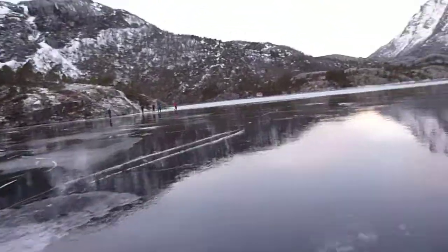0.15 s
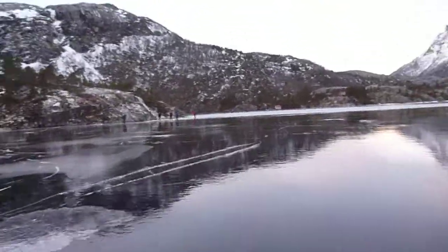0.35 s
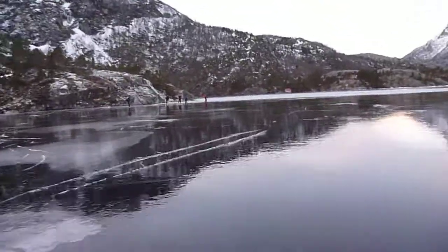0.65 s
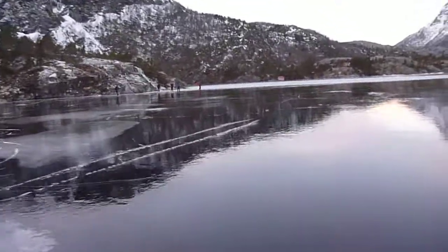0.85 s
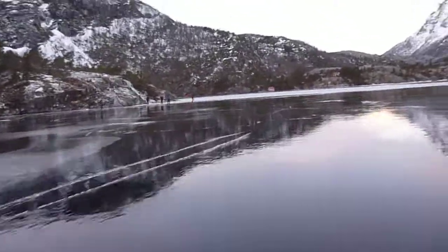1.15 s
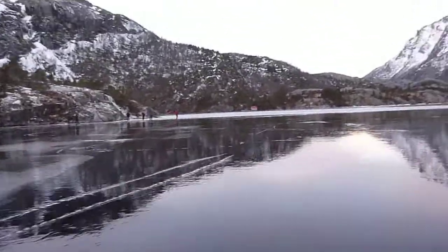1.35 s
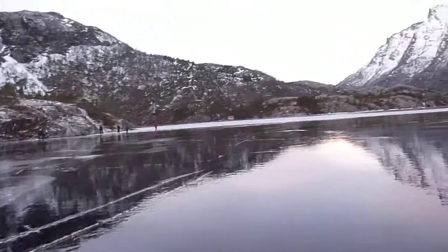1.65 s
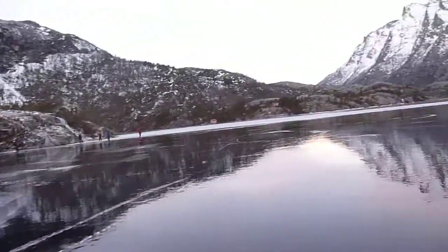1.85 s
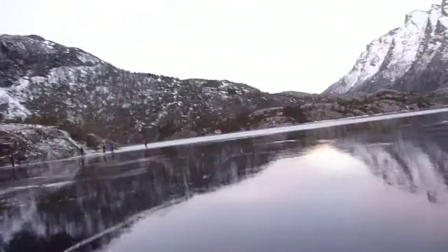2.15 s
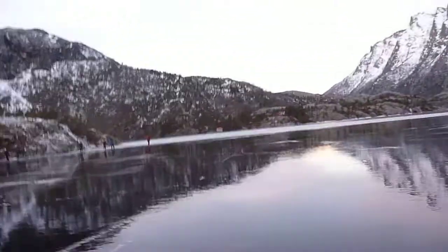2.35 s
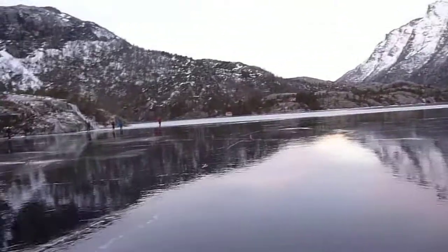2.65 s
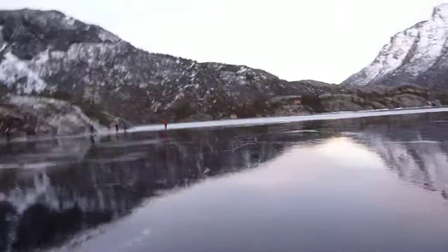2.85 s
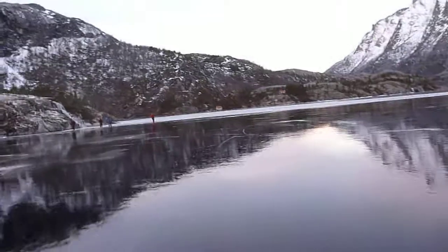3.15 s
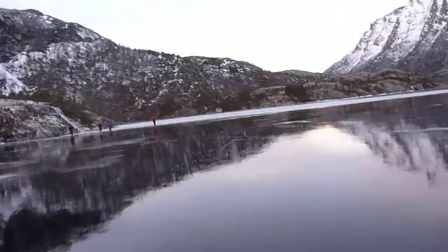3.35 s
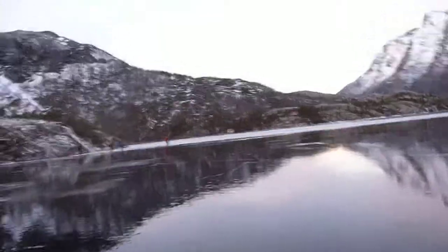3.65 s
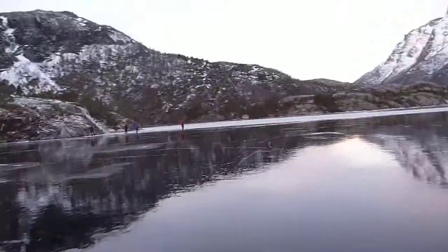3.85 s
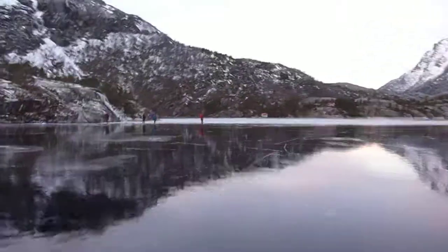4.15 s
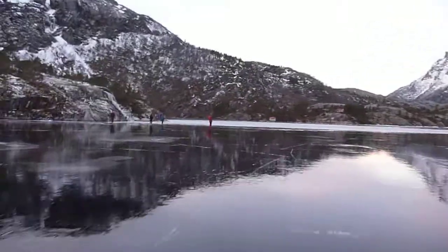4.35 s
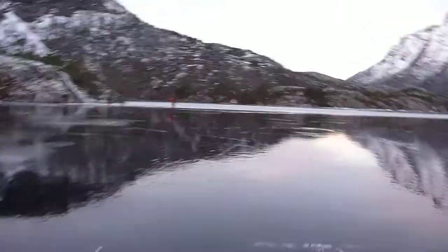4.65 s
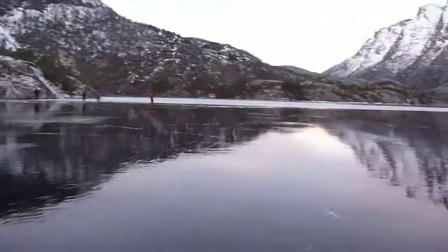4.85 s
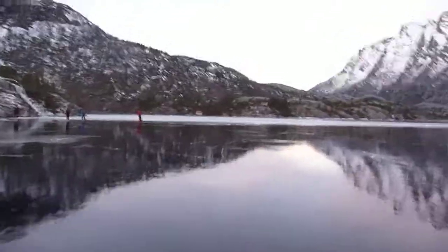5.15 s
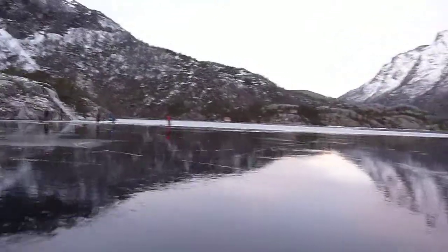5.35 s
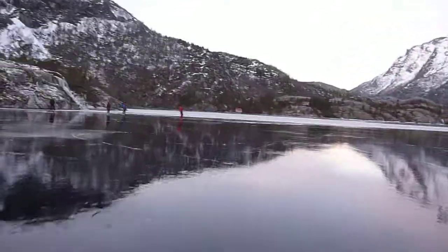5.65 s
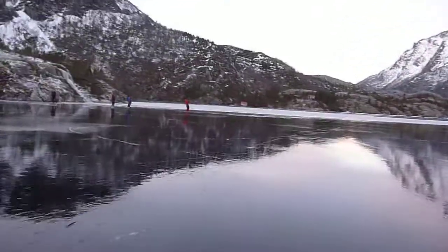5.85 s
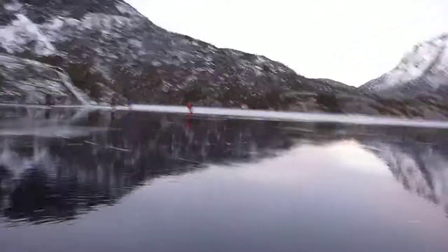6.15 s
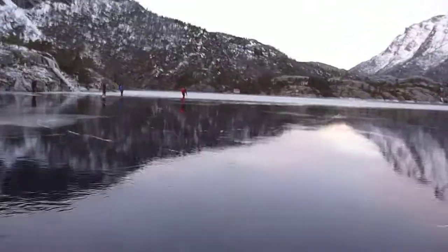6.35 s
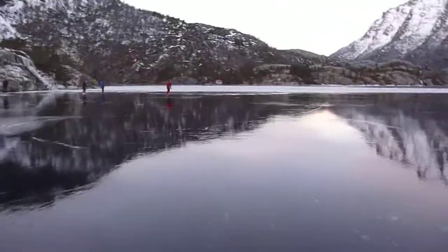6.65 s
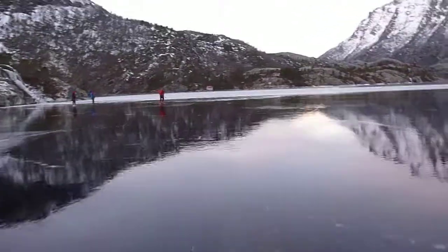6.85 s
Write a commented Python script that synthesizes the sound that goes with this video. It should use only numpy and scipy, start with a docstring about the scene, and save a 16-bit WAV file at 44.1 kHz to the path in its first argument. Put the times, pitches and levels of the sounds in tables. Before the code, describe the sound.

A skater crosses clear lake ice. Blades hiss and grind unevenly, swelling at short pushes, while sharp brittle cracks and clicks come thickest in the first second and a half. Another cluster of cracks hits past the middle, then they thin out. Faint low chirps fall and settle in the ice sheet. Open air, no echo, close thin microphone with muted deep lows and dull top.

```python
"""A skater glides over clear lake ice, heard dry in the open over a faint low rumble of moving air.
From the start the blades hiss and grind, louder at each push: patchy noise and chips drive resonances.
The ice soon cracks under the load: jolts and brief tearing ring it for milliseconds. Dragging steel sings
in narrow drifting noise bands. Throughout, the sheet gives falling chirps, some strong, some faint:
sine sweeps that settle near 310 Hz."""
import sys
import numpy as np
from scipy import signal
from scipy.fft import rfft, irfft, next_fast_len
from scipy.io import wavfile
from scipy.ndimage import uniform_filter1d, map_coordinates

SR = 44100
rng = np.random.default_rng(int(sys.argv[2]) if len(sys.argv) > 2 else 0)


def unload_wav(signal):
    """Save mono or channel-first audio to the path in sys.argv[1] as 16-bit WAV at rate SR, clipped to [-1, 1]."""
    wavfile.write(
        sys.argv[1],
        SR,
        np.round(np.clip(np.atleast_2d(signal).T, -1, 1) * 32767).astype(np.int16),
    )


N = 309341

# gliding blades: start_s, level_db, brightness_db, fizz_over_level_db
BLADES = [(0.0, -39, 0.5, -5.5), (0.45, -43.5, -0.5, -32), (0.64, -47.5, 5, -4.5), (1.13, -34.5, -2, -11),
          (1.29, -49.5, -1, -4), (1.6, -46, -0.5, -6.5), (1.63, -39, 0, -15), (1.79, -40, 2.5, -11),
          (1.89, -36, -1, -23), (2.26, -47.5, 0.5, -3.5), (2.52, -45.5, 1, -23), (2.71, -43, 2, -9),
          (2.87, -39.5, 7, 5), (3.05, -45.5, -1, -4.5), (3.18, -44, -0.5, -9), (3.49, -37.5, 0.5, -18),
          (4.02, -47.5, 0, -7), (4.07, -39.5, -0.5, -1), (4.2, -35, 2.5, -3), (4.38, -38, 2, -16.5),
          (4.45, -35.5, -5.5, -9), (4.5, -38.5, 5.5, -4), (4.71, -42.5, -1.5, -3.5), (4.9, -43, 2, -8),
          (5.21, -39, 0, -26), (5.56, -40, 3.5, -13.5), (5.99, -38, 2.5, -17), (6.032, -41, -0.5, -15),
          (6.05, -35.5, -1.5, -15.5), (6.21, -44, 3, 2), (6.4, -44, -1.5, -27.5), (6.68, -37, 1, -22),
          (6.93, -38, -2, -22.5), (7.01, -43.5, 5.5, -16)]
# click resonance of the ice: centre_hz, width_hz, level_db
CLICK = [(2080, 2820, 0.011)]


def amp(db):
    """dB to gain."""
    return 10 ** (np.asarray(db) / 20)


def unit(x):
    """Scaled to rms 1."""
    return x / np.sqrt(np.mean(x ** 2) + 1e-20)


def wobble(knots_per_s):
    """Smooth random curve: a spline through random knots."""
    knots = rng.standard_normal(int(N * knots_per_s / SR) + 4)
    return map_coordinates(knots, [np.arange(N) * knots_per_s / SR])


def filtered(x, response):
    """x times a complex response of frequency, along the last axis."""
    size = next_fast_len(x.shape[-1] + 2048)
    spectrum = rfft(x, size) * response(np.fft.rfftfreq(size, 1 / SR))
    return irfft(spectrum, size)[..., :x.shape[-1]]


def ringing(modes):
    """Causal response of a few resonances, added with alternating sign."""
    return lambda f: sum((-1) ** k * amp(db) * 1j * f * width / (hz * hz - f * f + 1j * f * width)
                         for k, (hz, width, db) in enumerate(modes))


def placed(start_s, rows):
    """Short sounds summed at their start times."""
    at = np.round(np.asarray(start_s) * SR).astype(int)[:, None] + np.arange(rows.shape[1])
    return np.bincount(at.ravel(), rows.ravel(), N + rows.shape[1])[:N]


def air():
    """Moving air: faint noise, mostly below 35 Hz."""
    return amp(-61.0) * unit(filtered(rng.standard_normal(N), lambda f: 1 / (1 + (f / 35) ** 2)))


def patchy(depth_db):
    """Noise whose strength drifts in patches of time and frequency."""
    spectrum = signal.stft(rng.standard_normal(N), nperseg=256)[2]
    field = uniform_filter1d(rng.standard_normal(spectrum.shape), size=3, axis=0)
    field = uniform_filter1d(field, size=14, axis=1)
    return unit(signal.istft(spectrum * amp(depth_db * unit(field)), nperseg=256)[1][:N])


def chips(per_second, spread_db, t60_s):
    """Ice chips breaking off at random: tiny noise bursts, a few much larger than the rest."""
    count = int(per_second * N / SR)
    t = np.arange(SR // 50) / SR
    size = amp(spread_db * np.minimum(rng.exponential(size=(count, 1)), 3))
    start_s = rng.uniform(0, N / SR, count)
    bursts = size * amp(-60 * t / t60_s) * rng.standard_normal((count, len(t)))
    return unit(placed(start_s, bursts))


def blades():
    """Steel edges shave the ice: patchy noise and chips drive its resonances, harder as an edge digs in."""
    # the edge digs in hard, and the short row at 3.602 s is a brief crackling burst: peak_s, rise_s, fall_s,
    # level_db, brightness_db, fizz_db
    push_table = [(.335, 0.026, 0.02, -33, -1, -41.5), (.76, 0.0049, 0.0059, -42, 4, -35),
                  (1.14, 0.011, 0.012, -33, 1.5, -41.5), (1.842, 0.032, 0.058, -41.5, 1, -55),
                  (2.579, 0.0036, .012, -40, 6.5, -39), (2.609, 0.0057, 0.013, -42.5, 6.5, -37),
                  (2.645, .012, 0.011, -40, 2.5, -42.5), (2.681, 0.0071, 0.0056, -37, 2.5, -48.5),
                  (2.723, 0.0028, 0.0065, -43, -2, -44.5), (2.866, 0.052, 0.024, -33.5, -2.5, -46.5),
                  (3.602, 0.0022, .005, -26.5, -2.5, -47), (3.618, 0.06, 0.021, -39.5, -7, -56),
                  (3.665, 0.018, 0.016, -30.5, -1.5, -42.5), (4.523, 0.0018, 0.0035, -38, 4.5, -42),
                  (4.549, 0.014, 0.025, -31, -1.5, -42), (5.057, 0.021, 0.014, -37.5, 0, -54),
                  (5.302, 0.039, 0.022, -34.5, -6, -44), (5.867, 0.042, 0.036, -42, 10, -58.5),
                  (6.084, 0.017, 0.033, -32.5, -4, -42), (6.133, 0.017, 0.032, -39.5, 6.5, -39),
                  (6.466, 0.0057, 0.062, -34, 3, -56), (6.55, 0.0024, 0.021, -38.5, -4.5, -47.5),
                  (6.918, 0.035, 0.026, -32.5, -3, -53)]
    # rows thud, knock, click, snap: glide_over_level_db, push_over_level_db, brightness_share
    edge_mix = [(-8, -13, -0.45), (-8, -5.5, -0.86), (-5, 1.5, 0.7), (-3.5, -7, 1)]
    # fine ice dust thrown up by the edges: time_s, level_db
    dust_table = [(0.0, -55.5), (0.54, -51.5), (1.09, -64), (1.29, -66), (1.56, -77), (1.87, -67),
                  (2.26, -73), (2.56, -46.5), (2.75, -75), (3.05, -62), (4.22, -57.5), (4.88, -51.5),
                  (5.7, -42), (6.37, -72), (6.68, -48), (7.01, -51)]
    # resonances of ice, sheet, fizz and spray: centre_hz, width_hz, level_db
    thud_modes = [(510, 313, 4)]
    sheet_modes = [(313.6, 19.5, 0.011)]
    knock_modes = [(730, 510, -3), (1348, 740, 3)]
    snap_modes = [(3660, 1970, 0.011)]
    fizz_modes = [(5450, 1000, -1)]
    spray_modes = [(7200, 2000, 0.011)]
    rumble_db, rumble_follows = -51.5, 0.5  # the glide's thud only half follows the level
    push_square = 1.5  # 2 a soft swell, more a flat top

    t = np.arange(N) / SR
    s, *columns = np.transpose(BLADES)
    level_db, bright_db, fizz_db = [np.interp(t, s, c) for c in columns]
    glide_db, push_db, share = np.transpose(edge_mix)[:, :, None]
    # rows: rumble, knock, click, snap, fizz
    parts_db = np.vstack([glide_db + share * bright_db, fizz_db]) + level_db
    parts_db = parts_db + [1.4 * wobble(7) for _ in range(5)]
    parts_db[0] = rumble_db + rumble_follows * (parts_db[0] - parts_db[0].mean())

    push = 0
    for peak, rise, fall, db, bright, fizz in push_table:
        swell = np.exp(-np.maximum((peak - t) / rise, (t - peak) / fall) ** push_square)
        push = push + amp(np.vstack([db + push_db + share * bright, [fizz]])) ** 2 * swell
    power = amp(parts_db) ** 2 + push
    # dust rises with snap and fizz
    dust = amp(np.interp(t, *np.transpose(dust_table))) ** 2 + 0.0027 * (power[3] + power[4])
    digging = push.sum(0) / power.sum(0)

    # the edge bites unevenly
    chatter_db = 0.9 * wobble(35) + 1.6 * wobble(90) + (1 + digging) * wobble(220)
    broken = chips(per_second=500, spread_db=4, t60_s=0.006)
    grit = 0.4 + 0.18 * digging  # chips over noise
    rumble = filtered(patchy(depth_db=2.5) + 0.58 * broken,
                      lambda f: ringing(thud_modes)(f) + 1.7 * ringing(sheet_modes)(f))
    scrapes = []
    for modes in (knock_modes, CLICK, snap_modes, fizz_modes, spray_modes):
        drive = (patchy(depth_db=3.0) + grit * broken) / np.hypot(1, grit)
        scrapes.append(filtered(drive, lambda f: ringing(modes)(f) ** 1.44))  # steeper skirts
    scraping = sum(np.sqrt(p) * unit(part) for p, part in zip([*power[1:], dust], scrapes))
    return np.sqrt(power[0]) * amp(0.49 * chatter_db) * unit(rumble) + amp(chatter_db) * scraping


def cracks():
    """A jolt and brief tearing ring the ice at each crack's own pitches; the thud answers mostly to the jolt.

    A bright crack loses its knock, a dull one its snap, a long one its jolt; small ones crackle around them.
    """
    # large cracks: start_s, peak_db, brightness_db, thud_peak_db, tearing_t60_s, thud_hz, knock_hz, snap_hz
    large = [(0.1803, -23.5, -16, -31.5, 0.028, 436, 1200, 4270),
             (0.2193, -23.5, 1.5, -34, 0.036, 342, 1530, 3040),
             (0.2754, -10.5, -9, -45, 0.0099, 590, 1160, 3940),
             (0.373, -17, 6, -54, 0.0073, 470, 1740, 5170), (0.397, -26, 16, -54, 0.01, 474, 1630, 3490),
             (0.406, -17, 2.5, -32.5, 0.0033, 460, 1310, 3340), (0.41, -18, 3, -36, 0.01, 470, 1350, 4440),
             (0.4352, -23, 2.5, -26, 0.015, 450, 1330, 3470), (0.452, -29, 11, -51, .008, 450, 1500, 5200),
             (0.468, -7.5, -5.5, -42.5, 0.0085, 482, 1360, 4400),
             (0.4717, -17, 29, -14, 0.013, 510, 790, 4300), (0.523, -21, 17, -35.5, 0.007, 443, 2450, 3500),
             (0.5441, -18.5, 8, -42.0, 0.0065, 580, 1250, 5400),
             (0.5497, -13, -3.5, -28.5, 0.0073, 415, 1500, 3130),
             (0.561, -20, 12, -41, 0.0078, 460, 1930, 3730), (0.5798, -19, 17, -39, 0.007, 450, 1430, 5050),
             (0.5921, -21, 7, -31, 0.011, 586, 1120, 4500), (0.6234, -19, 11, -42, 0.0029, 320, 1670, 4290),
             (0.634, -29.5, 5, -32.5, 0.0088, 550, 900, 3500), (0.666, -27, 12, -50, .015, 450, 1500, 3900),
             (0.6727, -22, 5, -23, 0.016, 556, 1800, 3450), (0.696, -23.5, 1, -34, 0.0039, 320, 2200, 5670),
             (0.7142, -21.5, 7, -35, 0.012, 417, 1660, 3930),
             (0.8, -4.5, 11.5, -31.5, 0.0056, 616, 1720, 4320),
             (0.872, -21, 6.5, -49, 0.006, 680, 1700, 3760), (0.967, -21, 18, -50, 0.024, 460, 1530, 3760),
             (1.0151, -18.5, 5.5, -38, 0.013, 330, 1420, 4000),
             (1.0735, -21.5, -2, -29.5, 0.0087, 710, 830, 3510),
             (1.085, -13.5, -5, -26, 0.012, 454, 1230, 3170),
             (1.101, -20, 1.5, -24.5, 0.021, 460, 820, 5470),
             (1.1562, -17, 0.5, -19.5, 0.01, 530, 763, 3230),
             (1.203, -20.5, 11, -38.5, 0.0063, 300, 1480, 6240),
             (1.222, -17, 4.5, -27, 0.012, 630, 1540, 4300),
             (1.254, -17.5, 27, -38, 0.027, 292, 1250, 4660), (1.273, -14, -2, -23, 0.007, 666, 1130, 4500),
             (1.3135, -20, 4.5, -30.5, 0.0085, 423, 1300, 4460),
             (1.317, -18.5, 4.5, -25.5, 0.012, 620, 1240, 4800),
             (1.4303, -23.5, 10, -58, 0.0049, 290, 1520, 4970),
             (1.46, -24.5, 6.5, -38, 0.013, 530, 2500, 4470),
             (1.539, -30.5, 3, -37.5, 0.021, 635, 2020, 4130),
             (1.597, -16.5, -3.5, -32.5, 0.003, 328, 1000, 3350),
             (1.9624, -18, -2.5, -29, 0.024, 346, 980, 3500),
             (2.007, -17, -18, -29.5, 0.021, 550, 1170, 3500),
             (2.136, -20, -2, -30.5, 0.011, 370, 1610, 3430),
             (2.15, -31.5, 3.5, -34.5, .02, 400, 1300, 5500),
             (2.207, -22.5, 12, -43, 0.0067, 288, 1550, 4950),
             (2.2753, -31, 2.5, -36, 0.024, 534, 2120, 3230),
             (2.453, -31, -4, -32.5, 0.0081, 453, 1250, 3690),
             (2.493, -29, -3, -41, 0.0044, 450, 1200, 3700), (2.519, -23, 8, -48, .004, 400, 2400, 5030),
             (2.5245, -19, 2.5, -36, 0.0072, 305, 1710, 3530),
             (2.5512, -27, 0, -38, 0.0085, 450, 1180, 5780), (2.7227, -24, 4, -45, 0.012, 543, 1190, 3470),
             (2.786, -23, -13, -34.5, 0.028, 395, 1300, 4040),
             (2.8041, -18, -5, -24, 0.0077, 490, 1160, 5700),
             (2.8159, -23, -4, -23, 0.0078, 533, 1330, 3260),
             (2.8836, -27, 3.5, -46, 0.0059, 400, 885, 5610),
             (3.0001, -28, -11, -31, 0.024, 555, 960, 4320),
             (3.022, -24, -2, -29.5, 0.011, 720, 1500, 2880),
             (3.0697, -21.5, 10, -61, 0.019, 480, 1550, 5100),
             (3.1958, -27.5, 1.5, -32.5, 0.0044, 467, 1530, 5530),
             (3.239, -23, 20, -40, 0.0085, 480, 930, 5300), (3.2815, -29.5, 1, -49, 0.005, 310, 1730, 3220),
             (3.351, -20.5, 15, -66, 0.0074, 590, 1500, 4970),
             (3.562, -16, -5.5, -24, 0.015, 464, 1550, 3130), (3.581, -28, -7, -28, 0.008, 480, 1030, 4380),
             (3.5989, -23, -5.5, -36, .012, 600, 1300, 4000),
             (3.613, -15.5, -4.5, -30, 0.0084, 635, 1040, 4070),
             (3.647, -18.5, -4, -23, 0.0067, 600, 1280, 3130),
             (3.6503, -13.5, -3, -27, 0.0076, 600, 1400, 3400),
             (3.6594, -18, -3, -28, 0.014, 650, 1200, 3400), (3.711, -26, 5, -35, 0.0049, 360, 1860, 4640),
             (3.7535, -40, 6, -31.5, 0.012, 330, 790, 3310),
             (3.7758, -16, -1.5, -20, 0.013, 566, 1310, 3730),
             (3.8276, -30, 0.5, -37.5, 0.014, 300, 1490, 6200),
             (3.861, -21.5, 11, -31.5, 0.037, 310, 1520, 5900),
             (3.8834, -27.5, 2, -30.5, 0.023, 523, 1910, 4030),
             (3.937, -27.5, 1, -33, 0.0094, 300, 1900, 4750),
             (3.9901, -19.5, 4.5, -27, 0.014, 470, 1850, 3440),
             (4.0126, -24, -1, -30.5, 0.012, 525, 980, 3600), (4.4, -26.5, -3, -42, 0.025, 440, 1140, 3200),
             (4.519, -26, 1, -40, 0.03, 352, 870, 3480), (4.552, -24.5, -11, -27, 0.011, 545, 1590, 5570),
             (4.593, -24, 2.5, -39, 0.0067, 390, 1960, 3600), (4.6244, -26, 6, -56, 0.022, 320, 1400, 4660),
             (4.765, -28, -19, -33, 0.012, 386, 1080, 5740),
             (4.8073, -23, 9, -45.0, 0.0074, 710, 1540, 5090),
             (5.1012, -23.5, 2, -41, 0.007, 320, 1820, 3130),
             (5.158, -22.5, -6, -30.5, 0.019, 430, 1290, 3140),
             (5.1824, -16.5, -5.5, -25, 0.012, 705, 1230, 3760),
             (5.309, -24, -5, -26, 0.0095, 710, 1310, 3680),
             (5.3285, -24, -8, -34, 0.0037, 704, 1000, 3300),
             (5.6052, -25.5, -7, -43, 0.011, 290, 1270, 3630),
             (5.7056, -23, 4, -42, 0.0098, 670, 2200, 3640), (5.935, -21, 12, -57, 0.0062, 390, 1280, 5000),
             (5.968, -22.5, -8, -45, 0.0087, 290, 1390, 4060),
             (6.005, -21.5, 12, -44, 0.022, 500, 1950, 4270),
             (6.022, -19, 4.5, -45.0, 0.017, 710, 1490, 4340),
             (6.041, -24, -7.5, -36, 0.0075, 547, 1310, 4400),
             (6.1295, -23.5, -3, -29.5, 0.007, 486, 2500, 3470),
             (6.183, -20, 8, -52, 0.018, 450, 1920, 4950), (6.321, -26.5, -24, -43, 0.03, 320, 2110, 3700),
             (6.384, -22, 13, -39, 0.01, 500, 2500, 4660), (6.4278, -24, 7, -50.0, 0.0079, 640, 960, 4400),
             (6.4384, -20.5, 9, -42, 0.014, 450, 1460, 4700),
             (6.453, -15, -1, -21.5, 0.02, 540, 1120, 3630), (6.489, -29, 8, -29, 0.023, 580, 2260, 5250),
             (6.656, -23, 3, -42, 0.017, 567, 1790, 3710),
             (6.8511, -16.5, -2.5, -23, 0.0069, 480, 1160, 4290),
             (6.923, -22, 2, -21, .008, 590, 1150, 4300), (6.9357, -25, -3, -29, 0.0068, 724, 1230, 4240),
             (6.9491, -19, 1.5, -29.5, 0.0092, 290, 1350, 4200)]
    small_per_s, small_offset_db, small_spread_db, scatter_s = 65, -4.5, 3, 0.09
    thud_q, knock_q, snap_q = 1.2, 1.24, 1.7  # pitch over width
    thud_rough = 0.32  # share of the tearing that reaches the thud
    jolt, jolt_t60_s = 1.15, 0.015  # jolt weakens when the tearing lasts longer than this

    draw = rng.standard_normal((round(small_per_s * N / SR), 8))
    parent = rng.choice(large, len(draw))
    near_s = parent[:, 0] + scatter_s * draw[:, 4]
    glide_db = np.interp(near_s, *np.transpose(BLADES)[:2])
    small_db = (parent[:, 1] + glide_db) / 2 + small_offset_db  # between parent and glide
    small_db = small_db + small_spread_db * np.minimum(draw[:, 0], 1.5)
    small = np.c_[np.clip(near_s, 0, N / SR), small_db, 3 + 4 * draw[:, 1],
                  small_db - 14 + 5 * np.minimum(draw[:, 2], 1),
                  0.01 * amp(3 * draw[:, 3]), [480, 1400, 4400] * amp(2 * draw[:, 5:])]
    columns = np.vstack([large, small]).T[:, :, None]
    s, peak_db, bright_db, thud_db, t60_s, thud_hz, knock_hz, snap_hz = columns

    knock_db = peak_db - 2 * np.maximum(bright_db, 0)
    snap_db = peak_db + 2 * np.minimum(bright_db, 0)
    click_db = peak_db + 4 - 1.14 * np.abs(bright_db)
    t = np.arange(SR // 25) / SR
    t60_s = np.maximum(t60_s, 1e-3)
    tearing = 0.36 * amp(-60 * t / t60_s) * rng.standard_normal((len(s), len(t)))
    tearing[:, :1] = -jolt * np.minimum(jolt_t60_s / t60_s, 1) ** 2
    thud_drive = np.c_[-np.ones(len(s)), thud_rough * tearing[:, 1:]]
    click_hz, click_width_hz = CLICK[0][:2]
    sound = 0
    for hz, width_hz, db, drive in ((thud_hz, thud_hz / thud_q, thud_db, thud_drive),
                                    (knock_hz, knock_hz / knock_q, knock_db, tearing),
                                    (click_hz, click_width_hz, click_db, tearing),
                                    (snap_hz, snap_hz / snap_q, snap_db, tearing)):
        part = filtered(drive, lambda f: ringing([(hz, width_hz, 0)])(f) ** 2 / (1 + 1j * f / (2 * hz)))
        sound = sound + amp(db) * part / np.abs(part).max(axis=1, keepdims=True)
    return placed(s[:, 0], sound)


def rasps():
    """Steel sings in a narrow, rough, drifting band while an edge drags; faint ones ride on the whole glide."""
    # singing steel: peak_s, half_length_s, from_hz, to_hz, width_hz, level_db
    singing = [(.33, 0.039, 1106, 1198, 400, -39.5), (.92, 0.022, 3800, 3900, 600, -38.5),
               (1.0, 0.091, 3920, 3880, 600, -40), (1.65, 0.03, 1840, 1840, 250, -39),
               (1.66, 0.013, 4430, 4330, 250, -38), (1.81, 0.047, 2000, 2140, 150, -39.5),
               (1.86, 0.065, 3550, 3430, 250, -39), (2.86, 0.017, 5940, 5470, 600, -34),
               (2.85, .02, 2393, 2280, 400, -39), (3.25, 0.045, 5050, 4970, 600, -40.5),
               (3.628, .014, 1277, 1280, 250, -35), (4.13, 0.018, 2100, 2500, 200, -40.5),
               (4.22, 0.079, 1550, 1590, 250, -40), (4.305, 0.018, 1550, 1546, 250, -39),
               (4.407, 0.011, 1166, 1140, 120, -33), (4.455, 0.015, 4270, 4320, 400, -37.5),
               (4.553, 0.02, 540, 532, 40, -34.5), (4.56, .03, 1500, 2300, 800, -32),
               (5.055, 0.0091, 2080, 2110, 300, -37.5), (5.291, .008, 1332, 1160, 250, -33),
               (5.314, .006, 1300, 1290, 250, -28), (5.56, 0.086, 3740, 3650, 500, -40),
               (5.72, 0.046, 3780, 3860, 700, -42), (5.86, 0.065, 3580, 3850, 600, -36.5),
               (5.93, 0.079, 1294, 1280, 250, -41), (6.13, 0.017, 3550, 3510, 250, -34),
               (6.135, .016, 2500, 2520, 500, -34.5), (6.49, 0.0077, 2330, 2430, 250, -31),
               (6.53, 0.016, 1990, 1950, 200, -37.5), (6.52, 0.073, 5610, 5240, 500, -36.5),
               (6.55, 0.018, 3700, 3620, 400, -41), (6.91, 0.046, 1187, 1278, 250, -39)]
    faint_per_s, faint_offset_db = 35, -9.5  # loudest faint ones against the glide

    draw = rng.uniform(size=(round(faint_per_s * N / SR), 5))
    at_s, hz = draw[:, 0] * N / SR, 1000 * 6 ** draw[:, 1]
    level_db = np.interp(at_s, *np.transpose(BLADES)[:2]) + faint_offset_db - 6 * draw[:, 2]
    faint = np.c_[at_s, 0.012 + 0.025 * draw[:, 3], hz, hz * (0.94 + 0.12 * draw[:, 4]), 0.08 * hz, level_db]
    s, half_s, from_hz, to_hz, width_hz, db = np.vstack([singing, faint]).T[:, :, None]

    t = np.arange(SR // 4) / SR - 1 / 8
    rough = filtered(rng.standard_normal((2, len(s), len(t))), lambda f: 1 / (1 + (2 * f / width_hz) ** 2))
    rough = rough / np.sqrt(np.mean(rough ** 2, axis=(0, 2), keepdims=True))
    drift_hz = from_hz + (to_hz - from_hz) * np.clip(0.5 + t / (2 * half_s), 0, 1)
    phase = 2 * np.pi * np.cumsum(drift_hz, axis=1) / SR
    band = rough[0] * np.cos(phase) + rough[1] * np.sin(phase)
    sound = amp(db) * np.exp(-(t / half_s) ** 2) * band
    at = np.round(s * SR).astype(int) + np.arange(len(t))
    # dropping half a window centres each rasp on its peak time
    return np.bincount(at.ravel(), sound.ravel(), N + len(t))[len(t) // 2:][:N]


def chirps():
    """Bending waves in the sheet: high pitches arrive first, the tail rests on the pitch that couples to air."""
    # strong falling chirps: start_s, level_db, t60_s
    strong = [(.69, -42, 0.33), (.81, -30, 0.061), (1.364, -36, 0.14), (1.41, -39, 0.14),
              (1.568, -33, 0.052), (1.615, -40, 0.2), (2.624, -30.5, 0.089), (2.913, -27, 0.03),
              (2.97, -30, 0.057), (3.535, -32, 0.094), (3.94, -39.5, 0.2), (3.265, -35, 0.073),
              (3.41, -31, 0.044), (3.85, -43, 0.068), (5.22, -34.5, 0.072), (5.58, -32.5, 0.06),
              (5.78, -44.5, 0.28), (5.845, -40, 0.14), (6.24, -38, 0.094), (6.465, -37, 0.086)]
    faint = rng.uniform(size=(int(6 * N / SR), 3)) * [N / SR, 7, 0.06] + [0, -50, 0.05]
    s, db, t60_s = np.vstack([strong, faint]).T[:, :, None]
    rest, sweep, slowness = rng.uniform(size=(len(s), 3)).T[:, :, None]
    t = np.arange(SR // 6) / SR
    hz = 300 + 25 * rest + (60 + 150 * sweep) * np.exp(-t / (0.004 + 0.004 * slowness))
    tone = np.sin(2 * np.pi * np.cumsum(hz, axis=1) / SR) * (1 - np.exp(-t / 0.005))
    return placed(s[:, 0], amp(db - 60 * t / np.maximum(t60_s, 0.01)) * tone)


def scene():
    """Open lake, no walls: all sources summed dry."""
    return (air() + blades() + cracks() + rasps() + chirps())[None]


def record(dry):
    """Thin microphone, a narrow notch filter near 2.9 kHz, nothing above the band limit."""
    # microphone response: at_hz, gain_db
    mic = [(25, -64.5), (60, -20.5), (150, -1), (260, 0.5), (320, 1.5), (7300, -5), (7650, -15.5),
           (7800, -22.5), (7880, -22), (8010, -31.5), (8170, -37), (8300, -22.5), (8650, -23.5),
           (9000, -39)]
    notch_hz, notch_width_hz, top_hz = 2890, 200, 9150
    at_hz, gain_db = np.transpose(mic)

    def response(f):
        """Microphone colour, notch and band limit."""
        colour = amp(np.interp(np.log(f + 1), np.log(at_hz), gain_db))
        off_notch = notch_hz ** 2 - f * f
        notch = off_notch / (off_notch + 1j * f * notch_width_hz)
        return colour * notch * (f < top_hz)

    return filtered(dry, response)


dry = scene()
out = record(dry)
unload_wav(out)
```